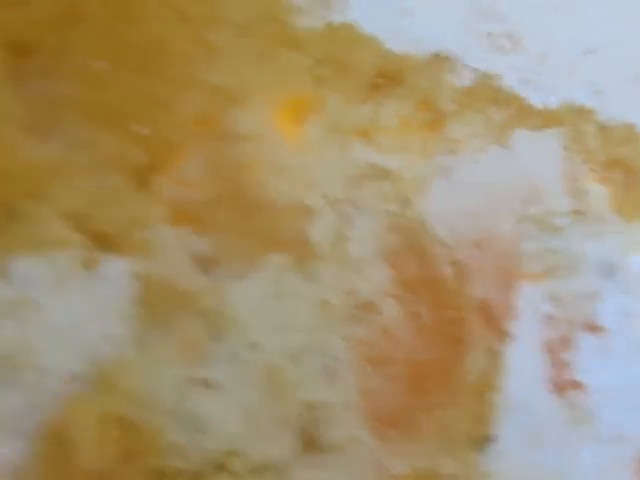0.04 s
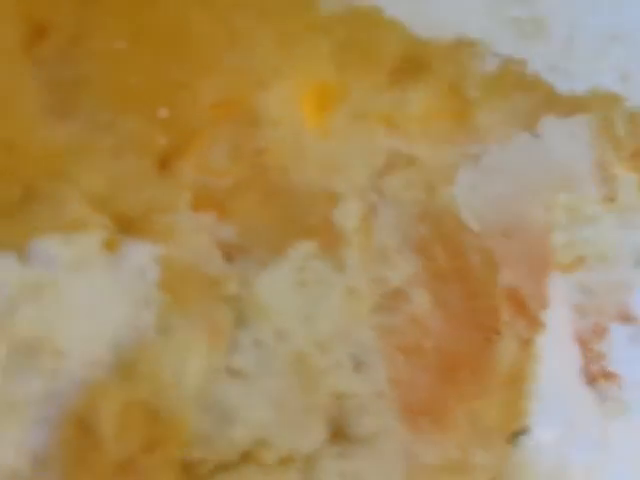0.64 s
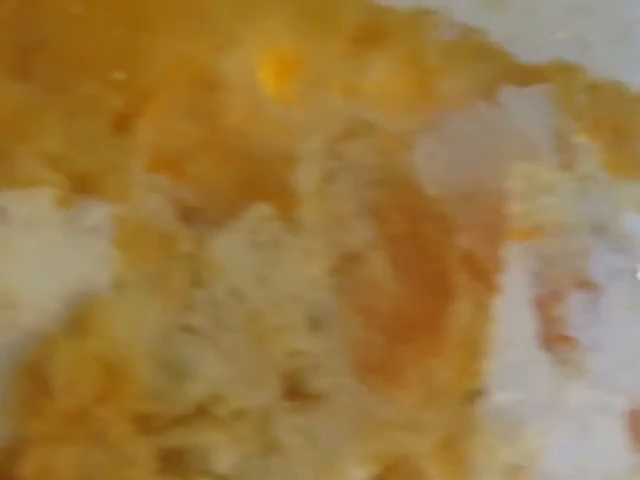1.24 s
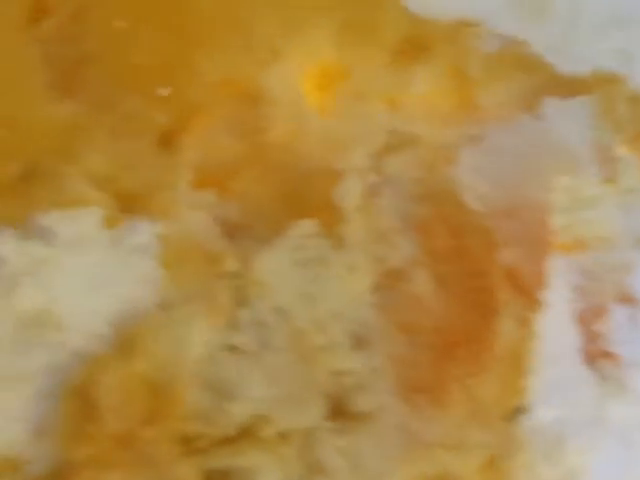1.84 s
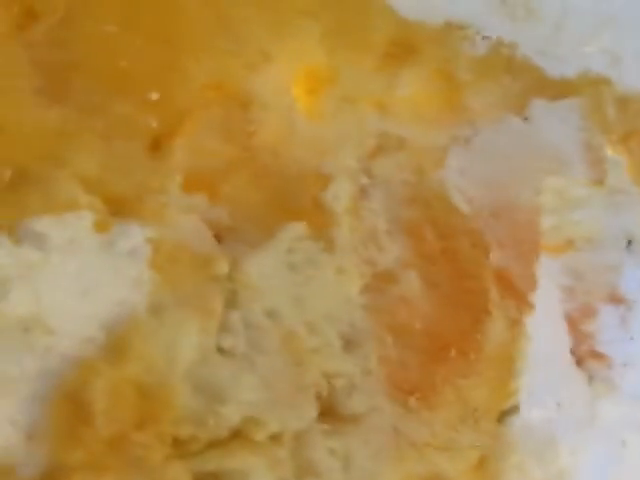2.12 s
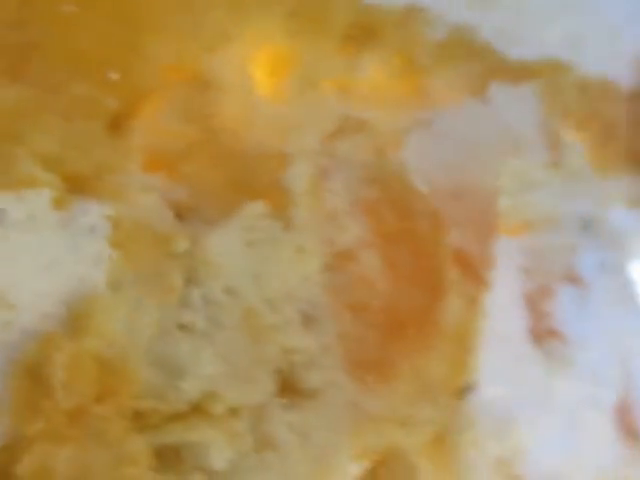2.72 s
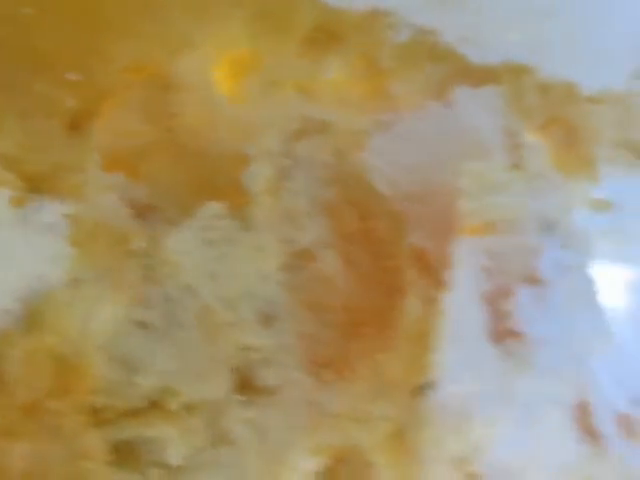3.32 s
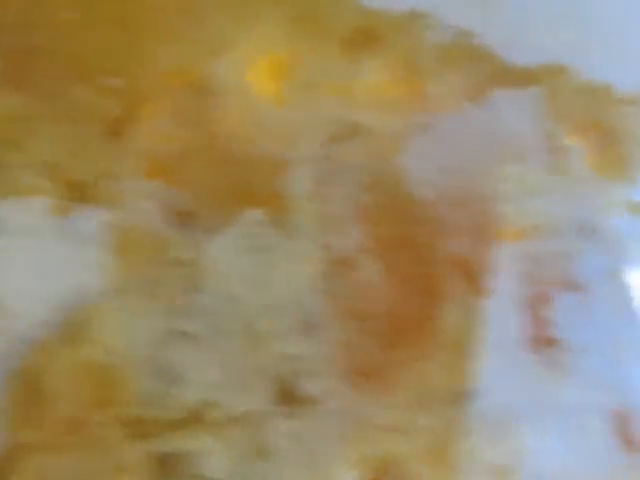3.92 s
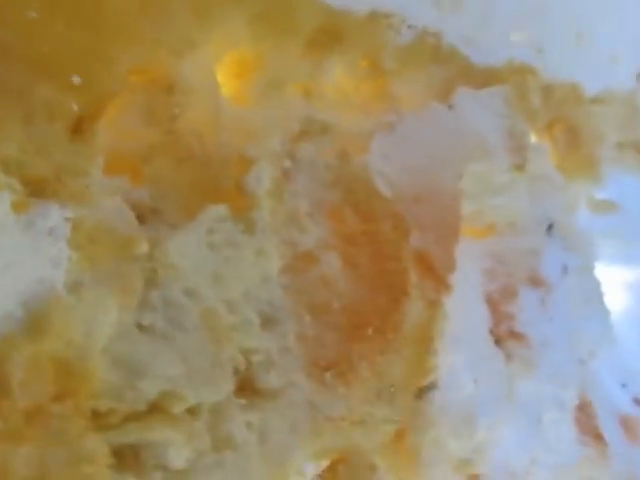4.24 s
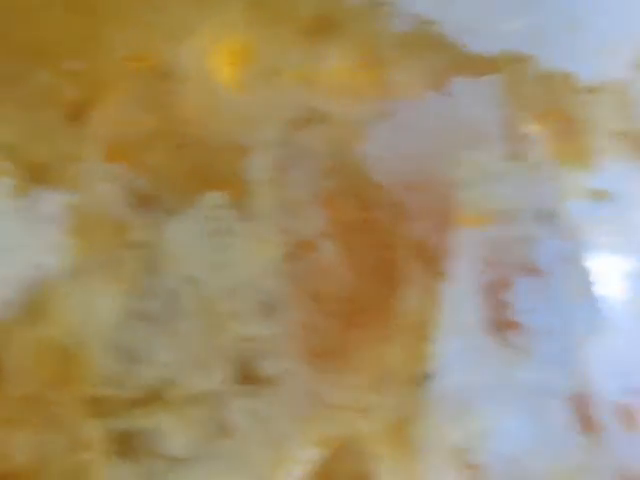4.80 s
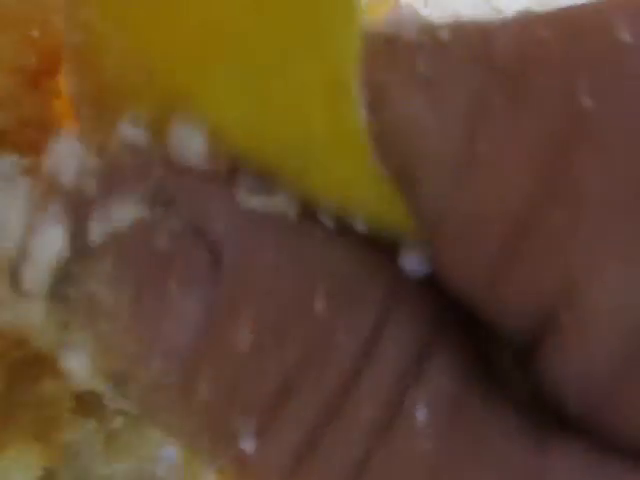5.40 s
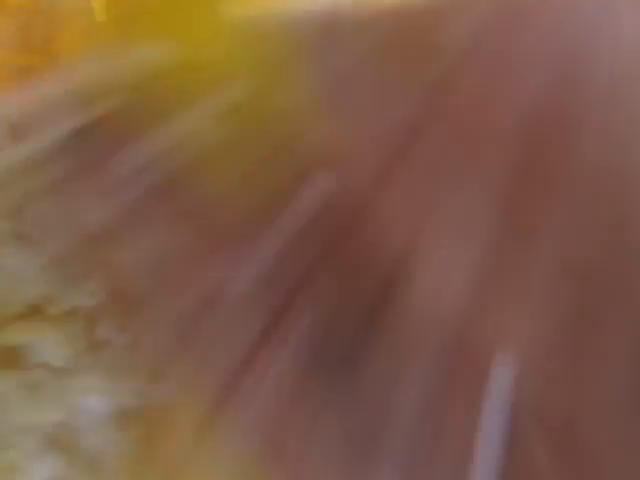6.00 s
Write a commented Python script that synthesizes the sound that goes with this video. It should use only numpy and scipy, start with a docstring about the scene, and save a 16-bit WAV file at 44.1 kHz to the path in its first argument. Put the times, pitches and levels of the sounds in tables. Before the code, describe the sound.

Sandpaper is rubbed by hand over a hard foam panel, very close to the microphone in a quiet yard. Short, dry rasps come about three times a second, each landing with a scuff, with a soft low boom from the panel and faint crumb crackle between them. After a brief lull near the end, the rubbing goes back and forth twice as fast, with a few sharp gritty ticks.

```python
"""A quiet yard, a camera's two microphones close to a hand rubbing sandpaper over a hard foam panel.
From the start each stroke lands with a scuff, rasps as the grit fractures the foam, and slows; the
panel booms softly beneath. Crumbs crackle, grains crack, and now and then the paper snags.
At 3.2 s comes one faint falling chirp, like a far bird. At 5.2 s the hand moves from beside the lens
to in front of it and goes back and forth twice as fast."""
import sys
import numpy as np
from scipy import signal
from scipy.fft import rfft, irfft, next_fast_len
from scipy.io import wavfile
from scipy.ndimage import map_coordinates

SR = 44100
rng = np.random.default_rng(int(sys.argv[2]) if len(sys.argv) > 2 else 0)


def dump_mix(stems):
    """Bounce the given channels to the path in sys.argv[1] as a 16-bit WAV at rate SR."""
    frames = np.atleast_2d(stems).T  # one column per channel
    limited = np.clip(frames, -1, 1)  # hard clip at full scale
    pcm = np.round(limited * 32767).astype(np.int16)
    wavfile.write(sys.argv[1], SR, pcm)


N = 271656
TIME = np.arange(N) / SR


def amp(db):
    """Decibels to gain."""
    return 10 ** (np.asarray(db) / 20)


def rms(x):
    """Root mean square."""
    return np.sqrt(np.mean(x ** 2) + 1e-20)


def along(points, hz):
    """Points (f/Hz, value) joined on a log frequency axis."""
    f, v = np.transpose(points)
    return np.interp(np.log(hz + 1), np.log(f + 1), v)


def wobble(rate):
    """A smooth random curve, rate knots a second."""
    return map_coordinates(rng.standard_normal(int(N * rate / SR) + 4), [TIME * rate])


def filtered(x, response):
    """x through a response given as a function of frequency."""
    size = next_fast_len(N + 8192)
    return irfft(rfft(x, size) * response(np.fft.rfftfreq(size, 1 / SR)), size)[..., :N]


def equalised(x, curve):
    """x through a curve of points (f/Hz, gain/dB)."""
    return filtered(x, lambda hz: amp(along(curve, hz)))


def shifting(x, depth_db, width_hz, hold_s):
    """Small resonances come and go at random, as when a patch of contact keeps changing."""
    hz, t, spectrum = signal.stft(x, SR, nperseg=1024)
    grid = np.meshgrid(np.sqrt(hz * 1500) / width_hz * 2, t / hold_s, indexing="ij")
    field = map_coordinates(rng.standard_normal((256, 512)), grid, mode="wrap")
    depth = depth_db * along([(200, 0.58), (1500, 0.78), (4000, 0.61), (12000, .6)], hz)[:, None]
    return signal.istft(spectrum * amp(depth * field), SR, nperseg=1024)[1][:, :N]


def grit(rate, spread_db, dust_db):
    """Two trains of tiny fractures of random size, over the even rush of fine dust."""
    count = int(rate * N / SR)
    sizes = rng.standard_normal((2, count)) * amp(spread_db * rng.standard_normal((2, count)))
    cracks = np.array([np.bincount(rng.integers(0, N, count), train, N) for train in sizes])
    return cracks / rms(cracks) + amp(dust_db) * rng.standard_normal((2, N))


def scrape(spectrum, resonances, balance, likeness, lead):
    """Steady scraping from one place, as four levelled stereo bands: rasp, hiss, body, thrum."""
    def colour(hz):
        lift_db = sum(db / (1 + ((hz - centre) / (width / 2)) ** 2) for centre, width, db in resonances)
        turn = np.arccos(np.clip(along(likeness, hz), 0, 1)) / 2  # a wide patch differs at each mic
        return amp(along(spectrum, hz) + lift_db) * [np.cos(turn), np.sin(turn)]

    def microphones(hz):
        side = np.array([[.5], [-.5]])
        return amp(side * along(balance, hz)) * np.exp(1j * side * along(lead, hz))

    def below(edge_hz):
        return filtered(pair, lambda hz: 1 / (1 + (hz / edge_hz) ** 6))

    def level(low_hz, high_hz):
        return rms(filtered(pair.mean(0), lambda hz: (hz > low_hz) & (hz < high_hz)))

    grains = grit(rate=14000, spread_db=1.5, dust_db=-2)
    grains = shifting(grains, depth_db=3.0, width_hz=160, hold_s=.05)
    common, apart = filtered(grains, colour)
    pair = filtered(np.array([common + apart, common - apart]), microphones)
    low, middle, high = below(380), below(1150), below(4060)
    rasp = (high - middle) / level(1200, 3500)
    hiss = (pair - high) / level(5000, 15000)
    body = (middle - low) / level(350, 1100)
    thrum = low / level(110, 300)
    return np.array([rasp, hiss, body, thrum])


# Slow rubbing is duller. Share of the effort followed by rasp, hiss, body, thrum: each dB/dB
EFFORT_SHARE = [1, 0.9, 0.73, .54]
# As a push goes on, the other bands gain on the rasp. Same order: each slope/(dB/s)
BAND_DRIFT = [-2.5, 35.5, 32, 45.5]
def rubbing(pushes, grip, brake, sag_db_per_s):
    """Power per band as each push lands, speeds up, sags and brakes; grip and brake bend the slopes."""
    touch_s, climb_db, braking_db = .004, 40, 30
    power = np.zeros((4, N))
    for start, rise, fall, rasp_db, hiss_db, body_db, thrum_db, *_ in pushes:
        span = slice(*np.searchsorted(TIME, [start - touch_s, start + rise + 2 * fall]))
        touch = np.clip(1 + (TIME[span] - start) / touch_s, 0, 1)
        since_peak = TIME[span] - start - rise
        before, after = np.maximum(-since_peak, 0), np.maximum(since_peak, 0)
        effort_db = -climb_db * (before / rise) ** grip
        effort_db -= sag_db_per_s * after + braking_db * (after / fall) ** brake
        colour_db = np.array([[0], [hiss_db], [body_db], [thrum_db]]) + np.outer(BAND_DRIFT, since_peak)
        power[:, span] += (touch * amp(rasp_db + colour_db + np.outer(EFFORT_SHARE, effort_db))) ** 2
    return power


# Close scraping, hand beside the lens and in front of it: f/Hz, relative level/dB
SPECTRUM_BESIDE = [(25, -11.5), (45, -16.5), (110, -1.5), (300, 1), (800, 0.5), (1130, 0), (2100, 1),
                   (3000, 0.5), (3700, -1.5), (5600, -3), (7500, -6.5), (9000, -10), (12000, -11),
                   (15500, -24)]
SPECTRUM_FRONT = [(25, -25.5), (70, -6.5), (130, 1), (290, 9), (520, 5), (1130, 2.5), (1550, 1.5),
                  (2150, -0.5), (3000, 2), (6000, -3), (7600, -7.5), (9200, -7.5), (12500, -15.5),
                  (15500, -23)]
# Resonances of the foam at the two places: f/Hz, width/Hz, lift/dB
FOAM_BESIDE = [(179.3, 52, 7.5), (394, 20, 6.5), (623, 180, 4), (900, 100, 3.5), (984, 39, 3),
               (1285, 280, 3.5), (1564, 200, 5.5), (1826, 290, 5), (2500, 640, 1.5)]
FOAM_FRONT = [(113, 50, 3.65), (393, 53, 4), (613, 110, 4.1), (910, 81, 6.6), (1434, 150, 5.4),
              (1597, 320, 8.3), (1830, 200, 2.8), (2800, 530, 1.5)]
# Left microphone over right: f/Hz, level/dB
BALANCE_BESIDE = [(60, 0.5), (99, -2), (160, -2.5), (270, -3), (450, 0.5), (740, -1), (1220, 5.5),
                  (2010, 3), (3330, 0.5), (5500, -4.5), (9080, -2.5), (15000, 4.5)]
BALANCE_FRONT = [(60, 1), (99, -2), (160, -1.5), (270, 0), (450, -0.5), (740, 0), (1220, 5.0), (2010, 5),
                 (3330, 0), (5500, 3.5), (9080, 0.5), (15000, 2)]
# Likeness of the two microphones: f/Hz, coherence/(0-1)
LIKENESS_BESIDE = [(100, 0.94), (400, 0.97), (900, 0.91), (1700, 0.7), (2050, 0.7), (2500, 0.6),
                   (5500, 0.43), (15000, 0.4)]
LIKENESS_FRONT = [(100, 0.94), (400, 0.97), (900, 0.85), (1700, 0.69), (2100, 0.66), (5000, 0.28),
                  (15000, 0.25)]
# Lead of the left microphone: f/Hz, phase/rad
LEAD_BESIDE = [(150, -.27), (270, -.22), (400, 0), (520, -.15), (700, .05), (1290, -.1), (2100, -1.5),
               (2450, -.9), (3800, -2.9), (5800, -3), (7600, -2.3), (9200, -3.3), (11000, -4),
               (14000, -6.2)]
LEAD_FRONT = [(150, -.15), (500, -.15), (1000, .05), (1330, 1.1), (2000, -.5), (3000, -.3), (4000, 1.1),
              (6000, -.3), (15000, -.2)]
# Pushes of the paper: t/s, speeding up/s, slowing down/s, rasp level/dB,
# then over the rasp hiss/dB, body/dB, thrum/dB, then the panel's boom delay/s, boom level/dB
STROKES = [(-0.091, 0.081, 0.1, -12.5, -12.5, -10, -17.5, 0.14, -43.5),
           (0.255, 0.084, 0.12, -18.5, -10, -7.5, -13, 0.16, -44),
           (0.736, 0.073, 0.084, -17.0, -10, -6, -14, 0.13, -39),
           (0.976, 0.038, 0.028, -17.5, -19, -4.5, -27.5, 0.06, -52),
           (1.045, 0.079, 0.079, -17.5, -9, -5.5, -19.0, 0.14, -40),
           (1.286, 0.037, 0.036, -22, -12.5, -8.0, -24.5, 0.025, -57.5),
           (1.358, 0.1, 0.13, -18.5, -11, -5, -18.5, 0.14, -50),
           (1.686, 0.1, 0.095, -17.5, -12, -5.0, -21, 0.17, -40),
           (2.035, 0.079, 0.1, -19, -11.5, -3.5, -19, 0.101, -52),
           (2.377, 0.08, 0.084, -18.0, -12, -5.5, -20, 0.12, -45.5),
           (2.716, 0.068, 0.11, -18.5, -11.0, -4, -17, 0.16, -49),
           (3.028, 0.12, 0.091, -23.5, -8.5, -5.5, -14, 0.172, -37.5),
           (3.411, 0.086, 0.11, -23.5, -8.5, -5, -10.5, 0.16, -45.5),
           (3.792, 0.056, 0.12, -20, -10.5, -7, -15, 0.12, -44.5),
           (4.125, 0.095, 0.11, -22.5, -9, -6, -16, 0.143, -46.5),
           (4.496, 0.076, 0.089, -21.0, -8.5, -5.5, -13.5, 0.12, -41.5),
           (5.006, 0.081, 0.08, -23.5, -9, -4.5, -10.5, 0.12, -58),
           (5.266, 0.11, 0.039, -20, -9.5, -6.5, -15.5, 0.089, -52),
           (5.42, 0.11, 0.05, -20.0, -7.0, -7, -10.5, 0.082, -37),
           (5.616, 0.078, 0.04, -18.0, -8, -8, -13, 0.088, -60),
           (5.794, 0.041, 0.047, -21.5, -7.5, -4.0, -8.5, 0.075, -47),
           (5.923, 0.078, 0.057, -18, -8.5, -9.5, -17.5, 0.13, -54),
           (6.059, 0.13, 0.089, -19.5, -3.5, -11, -4.5, 0.071, -42)]
# Light landings, returns and first bites: columns as for the strokes, without the boom
SCUFFS = [(0.236, 0.02, 0.022, -21.5, -12.5, -3, -7.5), (0.488, 0.086, 0.12, -58.5, -6, -1, -11),
          (0.579, 0.013, 0.015, -40.5, -3, -7.0, -21), (0.638, 0.0065, 0.047, -45, -14, -11, -20.0),
          (0.696, 0.029, 0.022, -40, -7.5, -7, -8), (0.9, 0.07, 0.09, -36.5, -3, -2.5, -3.5),
          (0.903, 0.012, 0.016, -40, -5, 4, -7.5), (1.058, 0.019, 0.036, -22, -13, -14, -20),
          (1.211, 0.027, 0.11, -40.5, -6.5, -3.0, -10), (1.25, 0.0076, 0.025, -27.5, -9, -5.5, -25.5),
          (1.376, 0.018, 0.079, -21.5, -9, -3, -24), (1.666, 0.023, 0.025, -30, -14.5, -1, -6.5),
          (1.706, 0.016, 0.085, -24, -17, -6, -14.5), (2.013, 0.022, 0.015, -28.5, -12.5, -0.5, -7.5),
          (2.053, 0.006, 0.078, -24, -17, -2, -9.5), (2.353, 0.0038, 0.03, -45, -5, -1, 5),
          (2.383, 0.023, 0.029, -24.5, -20, -0.5, -19), (2.549, 0.016, 0.0087, -44, 0.5, -1, -2.5),
          (2.641, 0.0055, 0.066, -40.5, -2, 1, -5), (2.684, 0.01, 0.019, -46.5, -8, 3.0, 7),
          (2.717, 0.017, 0.045, -23, -18, -9, -19), (3.055, 0.016, 0.021, -28.5, -8.5, -7, -3.5),
          (3.35, 0.0071, 0.042, -54, -4.5, 6.5, 4.5), (3.381, 0.024, 0.025, -31, -11.5, -1, -2.5),
          (3.736, 0.046, 0.0089, -30.5, -5, -0.5, -7.5), (3.786, 0.016, 0.02, -23, -13, -8, -17),
          (4.099, 0.036, 0.034, -33, -6.5, 1.5, -6.5), (4.458, 0.044, 0.0054, -32.5, -7, -0.5, -9),
          (4.635, 0.01, 0.085, -44, -7.5, -3.5, -6.5), (4.908, 0.013, 0.15, -45, -4, -3.5, -9.5),
          (4.931, 0.056, 0.032, -37.5, -3.5, -3, -3.5), (5.034, 0.01, 0.061, -23.5, -8.5, -19, -26),
          (5.203, 0.05, 0.047, -47, -5, 0, -8.0), (5.25, 0.011, 0.028, -28, -10, -5, -8.5),
          (5.264, 0.058, 0.039, -25.5, -5, 0.5, -4.5), (5.433, 0.0092, 0.008, -37, -2, -19, -12),
          (5.568, 0.055, 0.008, -40.5, -6, 1, -9), (5.629, 0.012, 0.032, -23.5, -9, -6, -14.5),
          (5.685, 0.079, 0.02, -58, -3, 0, 10), (5.759, 0.048, 0.055, -27, -4, -6, -9),
          (5.838, 0.081, 0.014, -52.5, -6, 2.5, 2.5), (6.074, 0.0085, 0.063, -36, 2, -1, -5),
          (6.098, 0.0071, 0.085, -24.5, -7, -2, -5.5)]
# In mid-stroke the grit catches on a ridge and tears through: t/s, rasp level/dB
SNAGS = [(0.342, -20), (0.991, -21.5), (2.09, -21), (3.142, -19.5), (3.485, -17), (3.841, -16.5),
         (4.202, -17.5), (5.986, -35)]
def sanding(in_front_s):
    """Sandpaper on foam, close to the microphones; it sticks and slips, so its strength flutters."""
    beside = scrape(SPECTRUM_BESIDE, FOAM_BESIDE, BALANCE_BESIDE, LIKENESS_BESIDE, LEAD_BESIDE)
    in_front = scrape(SPECTRUM_FRONT, FOAM_FRONT, BALANCE_FRONT, LIKENESS_FRONT, LEAD_FRONT)
    bands = np.where(TIME < in_front_s, beside, in_front)
    snags = [(start, .016, .012, db, -6.5, -11.5, -12.5) for start, db in SNAGS]  # columns as SCUFFS
    stroke_power = rubbing(STROKES, grip=3.04, brake=4.17, sag_db_per_s=207.5)
    scuff_power = rubbing(SCUFFS + snags, grip=2.19, brake=0.98, sag_db_per_s=-0.5)
    slip_db = 1.15 * wobble(90) + 1.1 * wobble(350)
    patch_db = 1.45 * np.array([wobble(80) for _ in bands])
    envelopes = amp(patch_db) * np.sqrt(stroke_power + scuff_power)
    return amp(slip_db) * np.sum(bands * envelopes[:, None], axis=0)


# The quiet between strokes: t/s, crumb level/dB, background level/dB (also for panel and air)
QUIET_LEVELS = [(0, -74, -58), (.6, -59, -59.5), (1.3, -66.5, -64), (1.95, -71, -56.5), (2.6, -77, -60),
                (3.3, -74, -59.5), (4.05, -77, -59.5), (4.85, -75, -66), (5.2, -62, -63),
                (6.16, -68, -58.5)]
def crumbs(rate, spread_db):
    """Loose foam dust under the paper: a faint, spiky crackle that goes on between the strokes."""
    times, crumb_db, _ = np.transpose(QUIET_LEVELS)
    colour = [(300, -5.5), (2500, 4.0), (6000, -1.5), (12000, -3.5), (16000, -15.5)]
    crackle = equalised(grit(rate, spread_db, dust_db=-12.0), colour)
    return amp(np.interp(TIME, times, crumb_db) + 2.5 * wobble(25)) * crackle / rms(crackle)


def panel(mode_hz, drift_rad):
    """The panel's lowest mode hums just under the background and booms as the hand brakes."""
    hum_db, swell_s, t60_s = -1.5, 0.036, .36
    times, _, background_db = np.transpose(QUIET_LEVELS)
    power = amp(np.interp(TIME, times, background_db) + hum_db + 2.7 * wobble(16)) ** 2
    for start, *_, delay, boom_db in STROKES:
        since_peak = TIME - start - delay
        swell = np.clip(1 + since_peak / swell_s, 0, 1)
        power += (swell * amp(boom_db - 60 * np.maximum(since_peak, 0) / t60_s)) ** 2
    return np.sqrt(2 * power) * np.sin(2 * np.pi * mode_hz * TIME + drift_rad * wobble(22))


# Ambience of the yard: f/Hz, relative level/dB
AIR_SPECTRUM = [(25, -3), (60, 10.5), (100, 4), (250, -2), (500, -11.5), (1200, -14.5), (1800, -20.5),
                (3000, -29.5), (6000, -37.5), (15000, -43)]
def air(apart_db):
    """The yard's quiet, low background, nearly the same at both microphones."""
    times, _, background_db = np.transpose(QUIET_LEVELS)
    noise = rng.standard_normal(N) + amp(apart_db) * rng.standard_normal((2, N))
    noise = equalised(shifting(noise, depth_db=1.5, width_hz=200, hold_s=0.32), AIR_SPECTRUM)
    return amp(np.interp(TIME, times, background_db)) * noise / rms(noise)


# Reverberation of the yard: f/Hz, t60/s
YARD_DECAY = [(100, 0.41), (500, 0.37), (2000, 0.24), (10000, 0.09)]
def yard(direct):
    """The surroundings answer the close sound weakly; the treble dies first."""
    hz, t, spectrum = signal.stft(rng.standard_normal((2, SR // 2)), SR, nperseg=256)
    decay = amp(-60 * t / along(YARD_DECAY, hz)[:, None])
    tail = signal.istft(spectrum * decay, SR, nperseg=256)[1]
    reflected = signal.fftconvolve(direct, tail / np.linalg.norm(tail[0]), axes=1)[:, :N]
    return equalised(reflected, [(150, -19.5), (500, -38.5), (1500, -35.5), (10000, -25.5)])


# Close ticks from the paper: t/s, level before colouring/dB
TICKS = [(0.145, -48), (0.2446, -34), (0.5367, -40.5), (0.645, -32), (0.8986, -45), (1.668, -39),
         (2.647, -34), (2.693, -31), (3.354, -48.5), (3.389, -39), (4.4481, -46.5), (4.8332, -53.5),
         (5.151, -35.5), (5.175, -39), (5.2898, -20), (5.44, -23), (6.0782, -20), (6.103, -16)]
def ticks(t60_s):
    """Single grains crack and the paper crinkles, each a dry burst of a few milliseconds."""
    track = np.zeros((2, N + SR))
    t = np.arange(SR // 20) / SR
    for start, db in TICKS:
        burst = 0.72 * rng.standard_normal(len(t)) + .6 * rng.standard_normal((2, len(t)))
        first = round(start * SR)
        track[:, first:first + len(t)] += amp(db - 60 * t / t60_s) * burst
    return equalised(track, [(200, -5.5), (1800, 3.5), (5000, 2.5), (7500, -3.5), (15000, -14.0)])


# One distant-sounding glide, centred between the microphones: t/s, f/Hz, level/dB
CHIRP_GLIDE = [(3.235, 2830, -70), (3.256, 2400, -55), (3.28, 2120, -63), (3.305, 2040, -60.5),
               (3.33, 1920, -67), (3.35, 1610, -72)]
def chirp(edge_s):
    """A faint, unsteady falling whistle, like a far bird."""
    times, hz, db = np.transpose(CHIRP_GLIDE)
    phase = 2 * np.pi * np.cumsum(np.interp(TIME, times, hz)) / SR + .3 * wobble(250)
    gate = np.clip(np.minimum(TIME - times[0], times[-1] - TIME) / edge_s + .5, 0, 1)
    return gate * amp(np.interp(TIME, times, db) + 1.5 * wobble(120)) * np.sin(phase)


def scene():
    """Paper and panel up close, the yard around them, at the two microphones."""
    work = sanding(in_front_s=5.2) + ticks(t60_s=0.016) + crumbs(rate=320, spread_db=1.0)
    return (work + yard(work) + panel(mode_hz=68.6, drift_rad=0.97)
            + chirp(edge_s=.003) + air(apart_db=-10.5))


def record(dry):
    """The camera rounds off the highest peaks, notches the treble and cuts off above its band limit."""
    ceiling, notch_hz, half_width_hz, top_hz = .85, 7820, 78, 15850
    rounded = dry / (1 + np.abs(dry / ceiling) ** 5) ** (1 / 5)
    notch = lambda hz: 1 - 1 / (1 + ((hz - notch_hz) / half_width_hz) ** 2)
    band_limit = lambda hz: 1 / (1 + (hz / top_hz) ** 160)
    return filtered(rounded, lambda hz: notch(hz) * band_limit(hz))


dry = scene()
out = record(dry)
dump_mix(out)
```